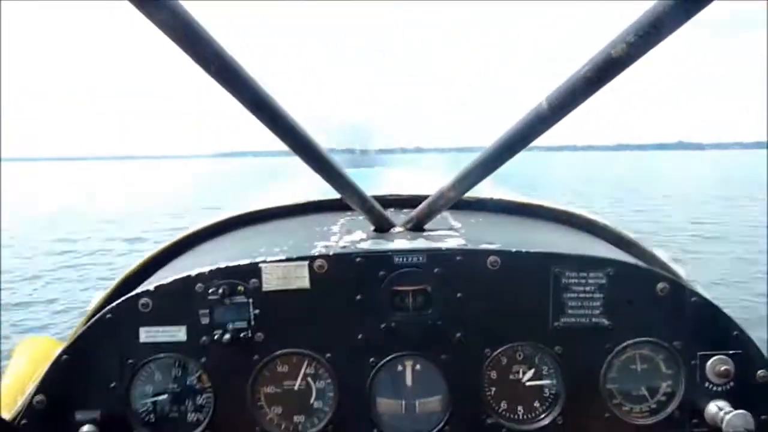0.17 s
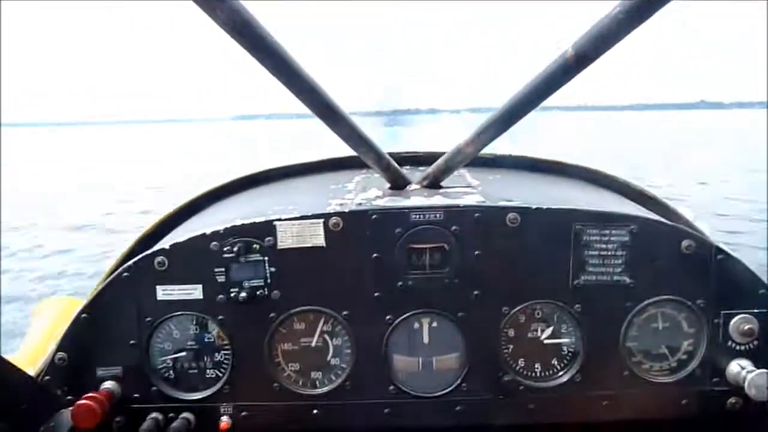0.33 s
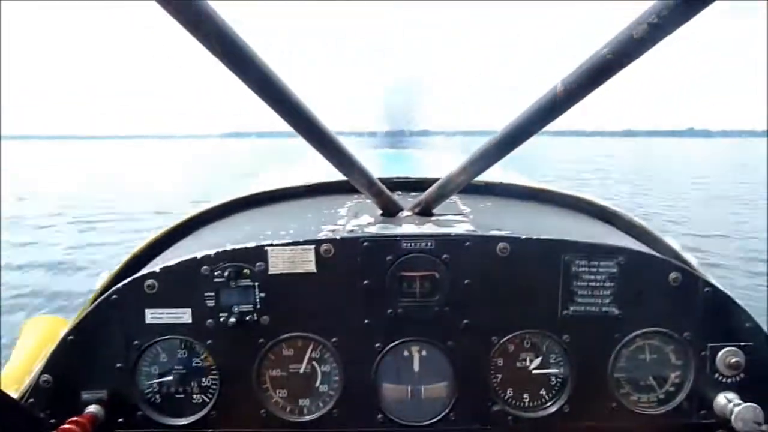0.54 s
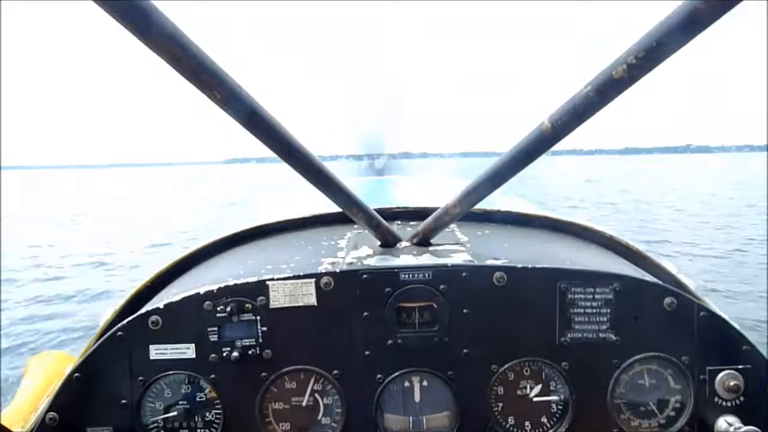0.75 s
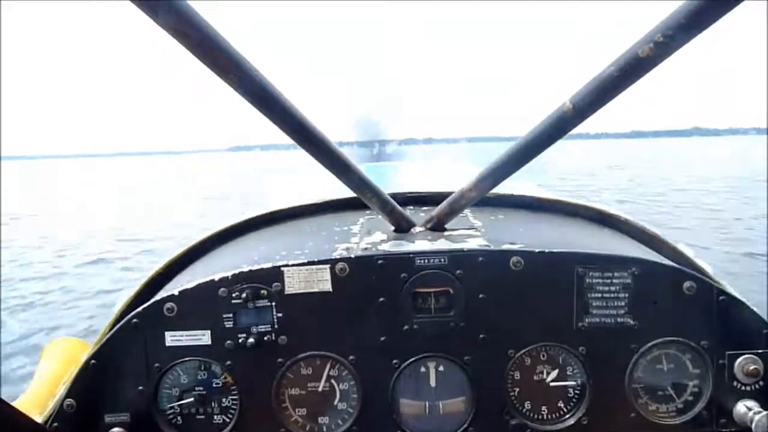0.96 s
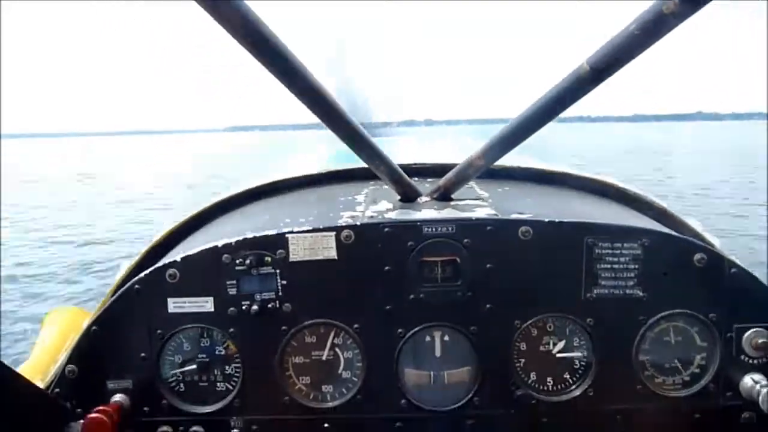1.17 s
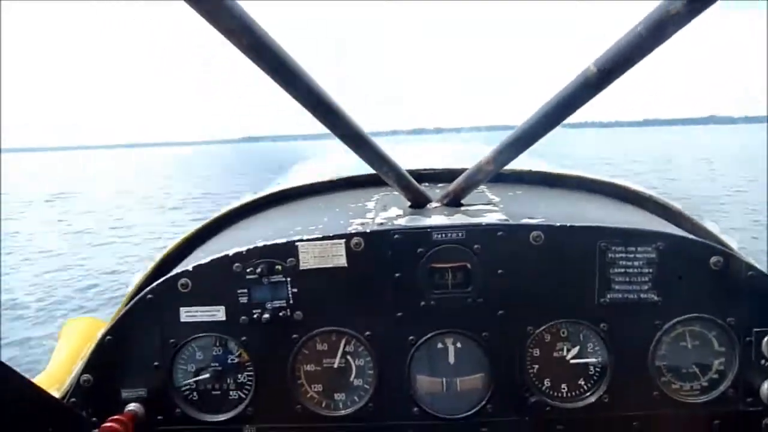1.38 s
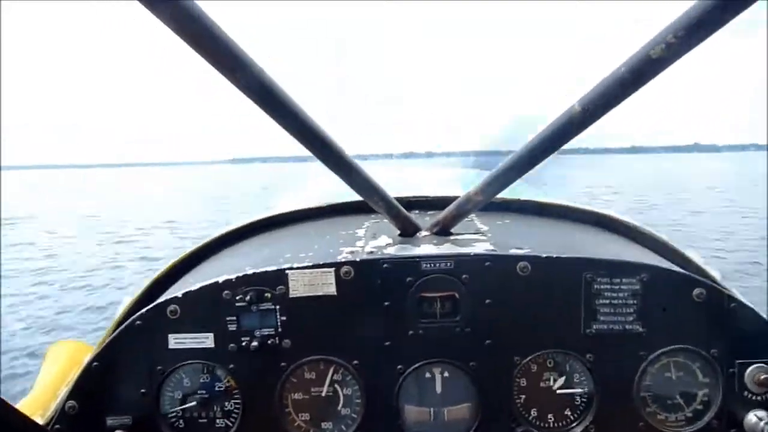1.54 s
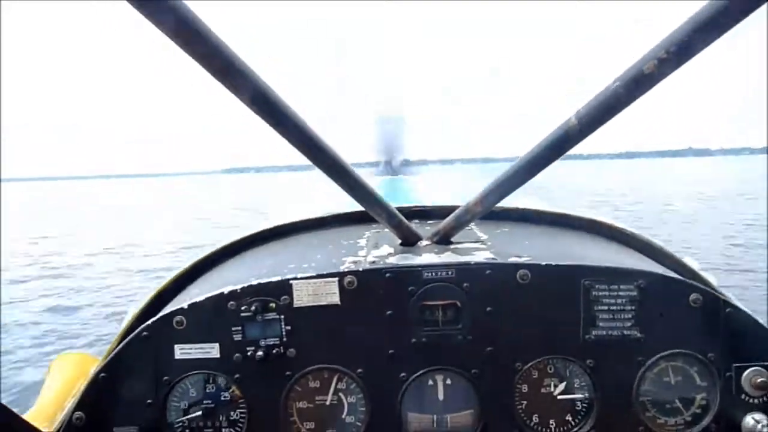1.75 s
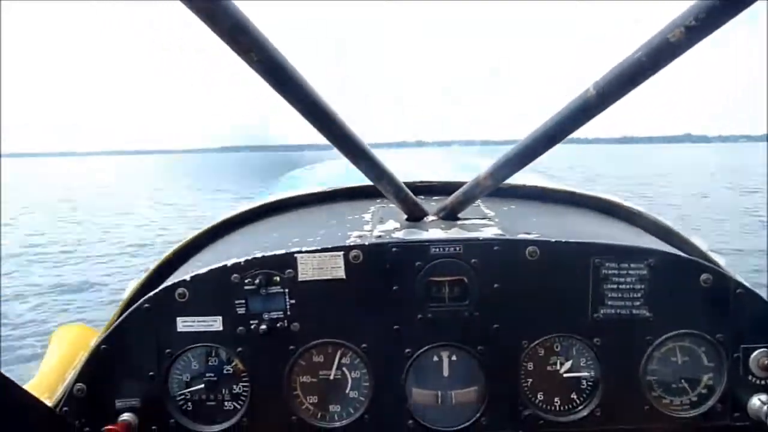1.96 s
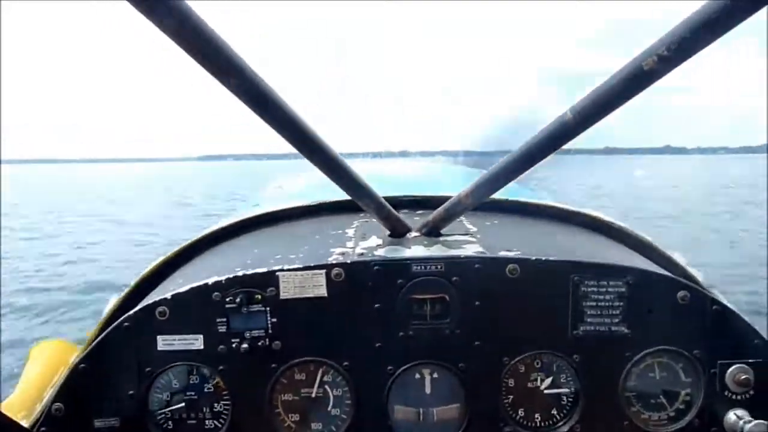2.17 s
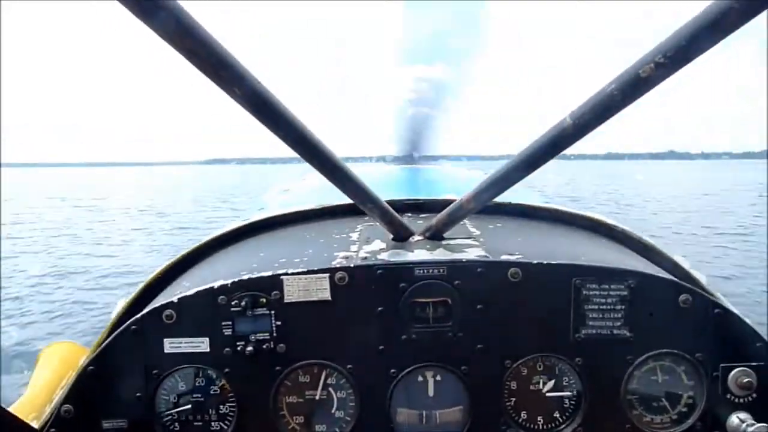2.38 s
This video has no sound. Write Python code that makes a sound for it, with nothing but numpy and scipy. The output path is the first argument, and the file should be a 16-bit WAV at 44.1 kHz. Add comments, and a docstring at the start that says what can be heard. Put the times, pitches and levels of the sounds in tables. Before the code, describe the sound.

Inside a small aircraft skimming a choppy lake, a rough low engine drone continues from start to end over booming rumble, while spray surges and irregular waves knock the hull, heard in mono through a cabin microphone.

```python
"""A propeller throbs and an engine growls in the cockpit of a small floatplane crossing a choppy lake.
Both are stacks of wavering partials. Spray and wash, made of shaped noise, rush along the floats in surges.
Short noise bursts slap the floats, and damped sines thud through the cabin.
Underneath lie the boom and rumble of the hull, an even hiss and two faint whines."""
import sys
import numpy as np
from scipy.fft import rfft, irfft, next_fast_len
from scipy.io import wavfile
from scipy.ndimage import uniform_filter1d, minimum_filter1d, map_coordinates

SR = 44100
rng = np.random.default_rng(int(sys.argv[2]) if len(sys.argv) > 2 else 0)


def generate_wav(signal):
    """Clip the signal to [-1, 1] and save it as 16-bit WAV at the path in sys.argv[1]."""
    frames = np.transpose(np.atleast_2d(signal))
    scaled = np.clip(frames, -1, 1) * 32767
    pcm = np.round(scaled).astype(np.int16)
    wavfile.write(sys.argv[1], SR, pcm)


N = 110691  # length in samples

# Faint steady whines [f/Hz, level/dB]
WHINES = [(4388, -71.5), (6666, -82.5)]
# Hull boom and deep rumble over time, each before its trim [t/s, level/dB]
BOOM_LEVEL = [(0, -28), (.14, -23), (.32, -26), (.4, -22.5), (.56, -26), (.9, -23.5), (1.07, -25),
              (1.15, -33.5), (1.24, -26.5), (1.4, -26), (1.55, -31), (1.65, -30.5), (1.94, -24),
              (2.09, -33.5), (2.2, -23), (2.25, -37), (2.3, -23.5), (2.51, -26.5)]
RUMBLE_LEVEL = [(0, -27.5), (.1, -25), (.23, -29), (.29, -29.5), (.39, -31), (.57, -28.5), (.73, -23.5),
                (.95, -32), (1.05, -26), (1.2, -31), (1.38, -28.5), (1.56, -30), (1.66, -23), (1.79, -24),
                (1.86, -32.5), (2.02, -27), (2.23, -29), (2.38, -32.5), (2.51, -26)]
# Wave crests slapping the floats [t/s, splash level/dB, hollow body level/dB, length/s]
SLAPS = [(0.149, -31, -21, 0.026), (.592, -18.5, -27, 0.0079), (0.812, -22, -35, 0.027),
         (0.912, -17.5, -22.5, 0.0079), (0.946, -26.5, -18.5, 0.023), (1.062, -15.5, -18.5, .014),
         (1.104, -23.5, -20.5, 0.011), (1.417, -22, -40, 0.012), (1.466, -21, -22.5, .016),
         (1.864, -24.5, -30, 0.022), (2.124, -21.5, -35, 0.023), (2.15, -27.5, -18, 0.017)]
# Heavier waves under the hull [t/s, f/Hz before detuning, ring level/dB, heave level/dB, length/s]
THUDS = [(.025, 140, -14.5, -38, 0.04), (.345, 149, -24, -17, 0.027), (.541, 157.3, -12, -23, 0.018),
         (1.064, 191, -14, -25, 0.013), (1.094, 155, -10, -27, 0.017), (1.437, 142, -24.5, -15.5, 0.036),
         (1.475, 152.3, -6.5, -22, .014), (1.597, 131.7, -17, -35, 0.041), (1.708, 157, -32, -17, 0.023),
         (1.733, 146, -13, -27, 0.013), (1.875, 147, -8.5, -41, 0.012), (1.899, 163.7, -19, -15.5, 0.03),
         (2.157, 142, -16.5, -14, .015)]
# Modes the hull rings with [multiple of the thud's f, level/dB against its ring level]
HULL_MODES = [(1, 0.5), (1.3, -10.5), (1.9, -13.5)]
# Strength of the water rush, before the spray and wash trims [t/s, level/dB]
RUSH_LEVEL = [(0, -31), (.1, -32.5), (.16, -32.5), (.28, -35), (.45, -30.5), (.52, -31.5), (.59, -34),
              (.8, -32), (.96, -31), (1.0, -32.5), (1.08, -34), (1.14, -35), (1.21, -35), (1.33, -32.5),
              (1.47, -31.5), (1.52, -37.5), (1.56, -34.5), (1.62, -31.5), (1.76, -30.5), (1.87, -31),
              (1.97, -37), (2.02, -32), (2.1, -36.5), (2.15, -32), (2.23, -35), (2.38, -31.5),
              (2.43, -34.5), (2.51, -29)]
# Propeller throb and engine growl over time, each before its trim [t/s, level/dB]
PROPELLER_LEVEL = [(0, -30), (.12, -23.5), (.19, -19), (.265, -24), (.31, -26.5), (.41, -25.5), (.45, -19),
                   (.52, -21), (.615, -16), (.645, -24.5), (.69, -22.5), (.84, -18), (.895, -28),
                   (.95, -22.5), (1.02, -19), (1.06, -26.5), (1.18, -33), (1.39, -31.5), (1.68, -39),
                   (1.8, -22.5), (1.86, -37.5), (1.97, -22), (2.09, -30), (2.26, -28.5), (2.32, -25.5),
                   (2.42, -22.5), (2.47, -18.5), (2.51, -38.5)]
ENGINE_LEVEL = [(0, -33.5), (.17, -31.5), (.24, -39), (.46, -37), (.56, -38), (.96, -31), (1.02, -36.5),
                (1.28, -34.5), (1.44, -30), (1.55, -39.5), (1.65, -30.5), (1.9, -31), (1.96, -43),
                (2.23, -36), (2.4, -29.5), (2.51, -37)]
# Partials of the propeller and of the crankshaft [multiple of the rate, relative level/dB]
BLADE_ORDERS = [(1, -15), (2, -4), (4, -16)]
CRANK_ORDERS = [(2, -0.5), (3, -1.5), (6, -1.5), (8, -4), (9, -8)]
# Noise colours of hull, slaps and water [f/Hz, relative level/dB per Hz]
BOOM_COLOUR = [(50, -53), (100, -6.5), (128, 3), (155, -0.5), (192, 1), (212, -7), (300, -24.5),
               (600, -65.5), (2000, -120)]
RUMBLE_COLOUR = [(15, -38), (30, -25.5), (45, -7.5), (58, -4), (68, -1.5), (76, -3), (87, -5), (105, -4.5),
                 (200, -33), (1500, -120)]
SLAP_COLOUR = [(100, -18.5), (300, 2.5), (550, -4.5), (900, -3), (1300, -14), (3200, -27), (5000, -55.5),
               (7000, -120)]
BODY_COLOUR = [(100, -30), (230, 3.5), (320, 1), (430, -12.5), (800, -38), (3000, -120)]
SPRAY_COLOUR = [(200, -40.5), (700, -2.5), (1000, 1.5), (1400, -2.5), (1700, -1), (2300, -6.5), (3300, -10),
                (3700, -16.5), (4300, -27), (5000, -36.5), (5800, -45), (7000, -120)]
WASH_COLOUR = [(100, -9), (230, 2), (275, 4), (340, 1.5), (410, 0), (442, -7), (490, 0.5), (530, -0.5),
               (568, 0), (620, -2), (680, -6), (760, 0), (810, -3), (880, 1), (1000, -15.5), (1500, -55),
               (5000, -120)]

BLADE_HZ, CRANK_HZ = 82.5, 94.52  # centre rates, before they waver
PROPELLER_TRIM_DB, ENGINE_TRIM_DB = -1.5, -1.5
SPRAY_TRIM_DB, WASH_TRIM_DB, BOOM_TRIM_DB, RUMBLE_TRIM_DB = 1, 5, 1, -0.5
HISS_DB = -60  # before the low-pass
ROUGH_PER_S = 40  # random level knots a second in each partial
SLAP_ATTACK_S, THUD_ATTACK_S = 0.0025, 0.0037
HEAVE_HZ = 70  # the whole cabin's deepest mode, before detuning
RING_SPREAD = 0.025  # random detuning of each mode, as a fraction
LIMIT_DB, LIMIT_HOLD_S = -6.8, 0.006
TOP_HZ = 7600  # low-pass corner


def amp(db):
    """Decibels to gain."""
    return 10 ** (np.asarray(db) / 20)


def unit(x):
    """Scale to rms 1."""
    return x / np.sqrt(np.mean(x ** 2) + 1e-20)


def level_curve(rows):
    """Straight lines between (time, level) points, one value per sample."""
    times, levels = np.transpose(rows)
    return np.interp(np.arange(N) / SR, times, levels)


def wobble(rate):
    """A smooth random curve with this many knots a second."""
    knots = rng.standard_normal(1024)
    return map_coordinates(knots, [np.arange(N) * rate / SR], mode="mirror")


def filtered(x, response):
    """Multiply the spectrum of x by a response of frequency."""
    size = next_fast_len(N + SR // 2)  # padded so the tail does not wrap round
    hz = np.fft.rfftfreq(size, 1 / SR)
    return irfft(rfft(x, size) * response(hz), size)[:N]


def coloured(x, spectrum):
    """Shape x by spectrum points joined on a log frequency axis, at rms 1."""
    f, db = np.transpose(spectrum)
    return unit(filtered(x, lambda hz: amp(np.interp(np.log(hz + 1), np.log(f + 1), db))))


def splashes(spectrum, clump_db, rate):
    """Coloured noise whose level wobbles first, so that it gathers in clumps."""
    clumped = rng.standard_normal(N) * amp(clump_db * wobble(rate))
    return coloured(clumped, spectrum)


def steadied(x, window_s):
    """Noise with its slow chance swells evened out by its own smoothed power."""
    size = max(int(window_s * SR), 2)
    power = uniform_filter1d(uniform_filter1d(x ** 2, size), size // 2)
    return unit(x / np.sqrt(np.abs(power) + 1e-9))


def blow(start, length, attack):
    """Time since a blow, and its envelope: a quick rise, then a fall as the water damps it."""
    t = np.maximum(np.arange(N) / SR - start, 0)
    rise = 1 - np.exp(-t / attack)
    fall = np.exp(-(t / length) ** 2 / 2)
    return t, rise * fall


def partials(rate_hz, orders, wander, rough_db):
    """Sine multiples of a wavering rate, each fluttering in level, at rms 1 together."""
    wavering_hz = rate_hz * (1 + wander * wobble(rate=20))
    phase = 2 * np.pi * np.cumsum(wavering_hz) / SR
    total = np.zeros(N)
    for order, db in orders:
        flutter_db = rough_db * wobble(ROUGH_PER_S)
        tone = np.sin(round(order) * phase + rng.uniform(0, 2 * np.pi))
        total += amp(db + flutter_db) * tone
    return unit(total)


def hiss():
    """White noise makes a thin even hiss, with steady sines for the faint whines."""
    t = np.arange(N) / SR
    whines = sum(amp(db) * np.sin(2 * np.pi * hz * t) for hz, db in WHINES)
    return amp(HISS_DB) * rng.standard_normal(N) + whines


def hull():
    """The cabin booms and rumbles as the floats ride the chop: two bands of low noise."""
    boom = steadied(splashes(BOOM_COLOUR, clump_db=2.0, rate=65), window_s=0.09)
    rumble = steadied(splashes(RUMBLE_COLOUR, clump_db=-2.5, rate=37), window_s=0.075)
    boom_gain = amp(BOOM_TRIM_DB + level_curve(BOOM_LEVEL))
    rumble_gain = amp(RUMBLE_TRIM_DB + level_curve(RUMBLE_LEVEL))
    return boom_gain * boom + rumble_gain * rumble


def slaps():
    """Wave crests slap the floats: each blow opens a bright splash and a hollow body of noise."""
    splash_gain, body_gain = np.zeros((2, N))
    for start, splash_db, body_db, length in SLAPS:
        _, envelope = blow(start, length, SLAP_ATTACK_S)
        splash_gain += amp(splash_db) * envelope
        body_gain += amp(body_db) * envelope
    splash = steadied(coloured(rng.standard_normal(N), SLAP_COLOUR), window_s=0.025)
    body = steadied(coloured(rng.standard_normal(N), BODY_COLOUR), window_s=0.025)
    return splash_gain * splash + body_gain * body


def mode(hz, t):
    """One sine mode, detuned a little at random for each blow."""
    return np.sin(2 * np.pi * hz * rng.normal(1, RING_SPREAD) * t)


def thuds():
    """Heavier waves ring the hull's modes and heave the whole cabin at its deepest one."""
    thud = np.zeros(N)
    for start, hz, ring_db, heave_db, length in THUDS:
        t, envelope = blow(start, length, THUD_ATTACK_S)
        ring = sum(amp(db) * mode(hz * ratio, t) for ratio, db in HULL_MODES)
        heave = mode(HEAVE_HZ, t)
        thud += envelope * (amp(ring_db) * ring + amp(heave_db) * heave)
    return thud


def water():
    """Bright spray and a hollow wash along the floats: two noises that surge together."""
    rush_db = level_curve(RUSH_LEVEL)
    spray = splashes(SPRAY_COLOUR, clump_db=0.92, rate=270)
    wash = steadied(splashes(WASH_COLOUR, clump_db=1.5, rate=70), window_s=0.18)
    return amp(rush_db + SPRAY_TRIM_DB) * spray + amp(rush_db + WASH_TRIM_DB) * wash


def engine():
    """The engine growls on multiples of the crankshaft's rate."""
    growl = partials(CRANK_HZ, CRANK_ORDERS, wander=0.02, rough_db=4.5)
    return amp(ENGINE_TRIM_DB + level_curve(ENGINE_LEVEL)) * growl


def propeller():
    """The propeller throbs at its blade rate and multiples of it."""
    throb = partials(BLADE_HZ, BLADE_ORDERS, wander=0.017, rough_db=2.5)
    return amp(PROPELLER_TRIM_DB + level_curve(PROPELLER_LEVEL)) * throb


def scene():
    """Everything as it reaches the cockpit, in one channel."""
    mix = propeller() + engine() + water() + hull() + thuds() + slaps() + hiss()
    return mix[None]


def record(dry):
    """A limiter holds the peaks down, then a very steep low-pass closes the top."""
    hold = max(int(LIMIT_HOLD_S * SR), 1)
    needed_gain = np.minimum(1, amp(LIMIT_DB) / (np.abs(dry[0]) + 1e-9))
    smooth_gain = uniform_filter1d(minimum_filter1d(needed_gain, hold), hold)
    limited = dry[0] * smooth_gain
    return filtered(limited, lambda hz: 1 / np.sqrt(1 + (hz / TOP_HZ) ** 80))[None]


dry = scene()
out = record(dry)
generate_wav(out)
```